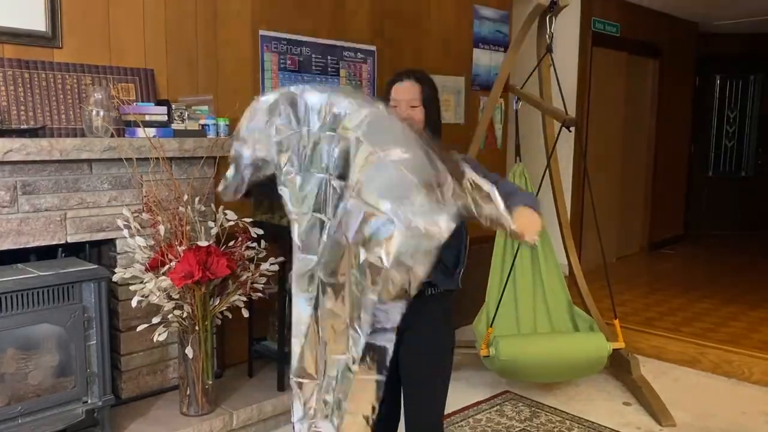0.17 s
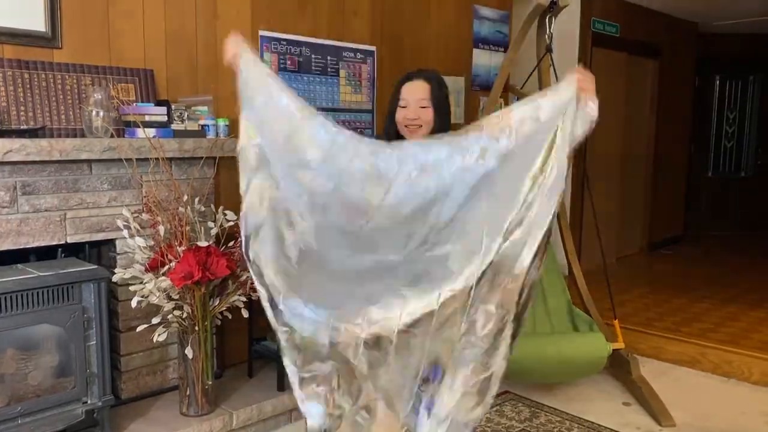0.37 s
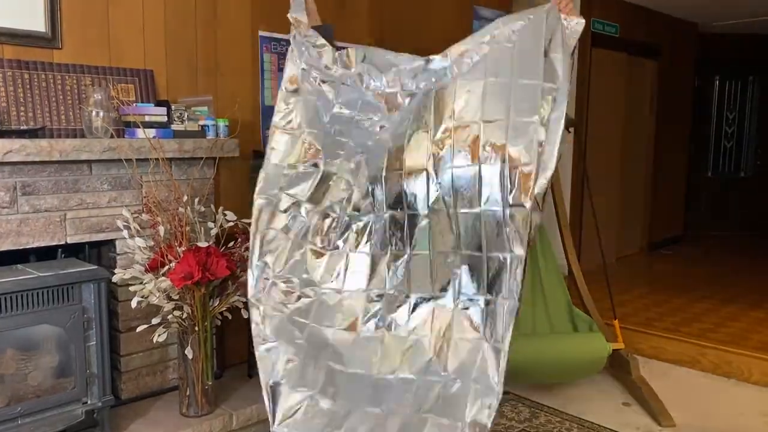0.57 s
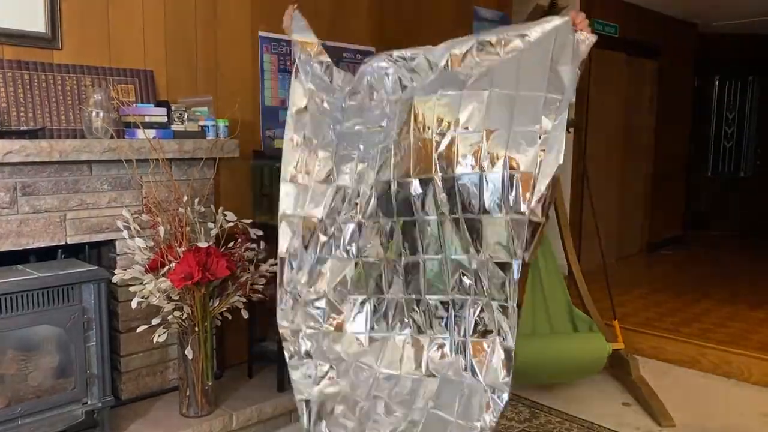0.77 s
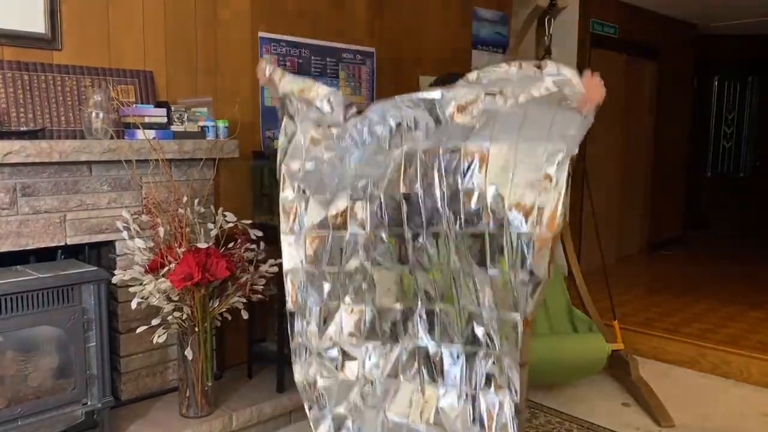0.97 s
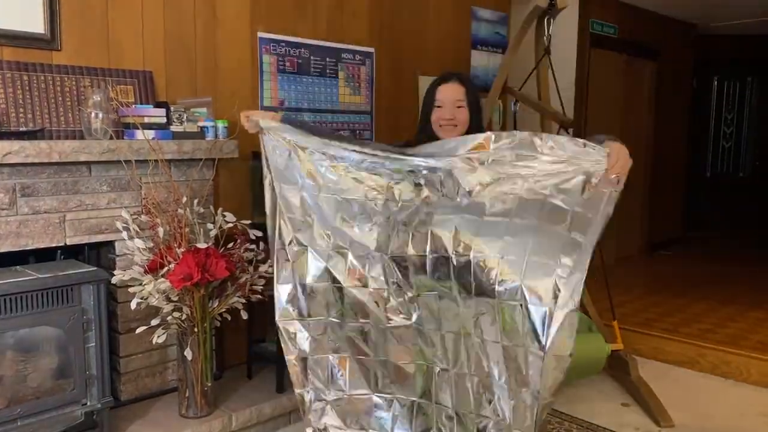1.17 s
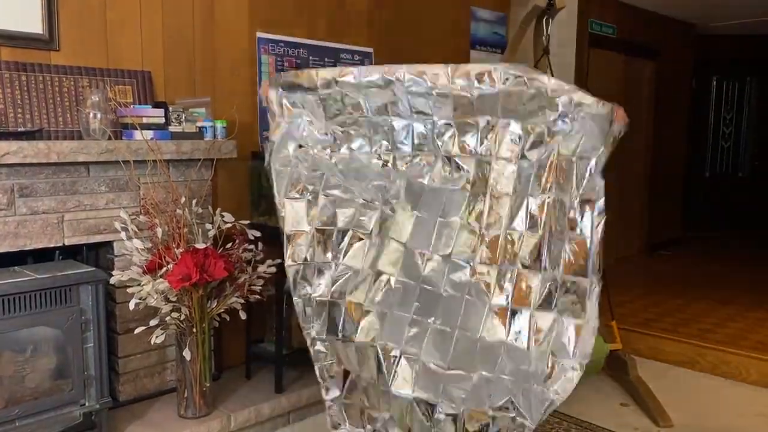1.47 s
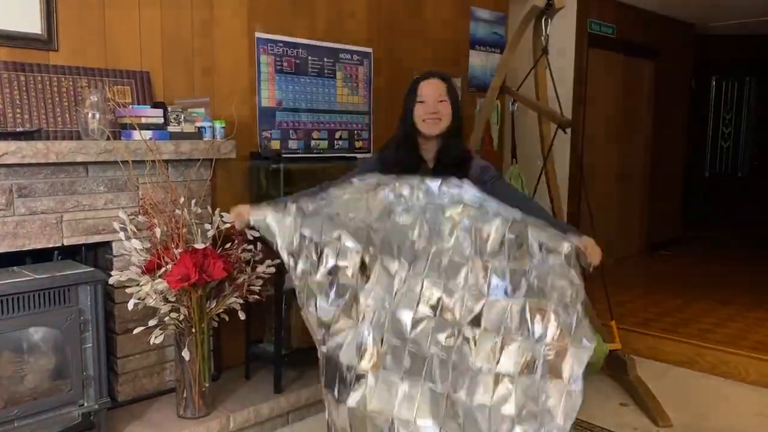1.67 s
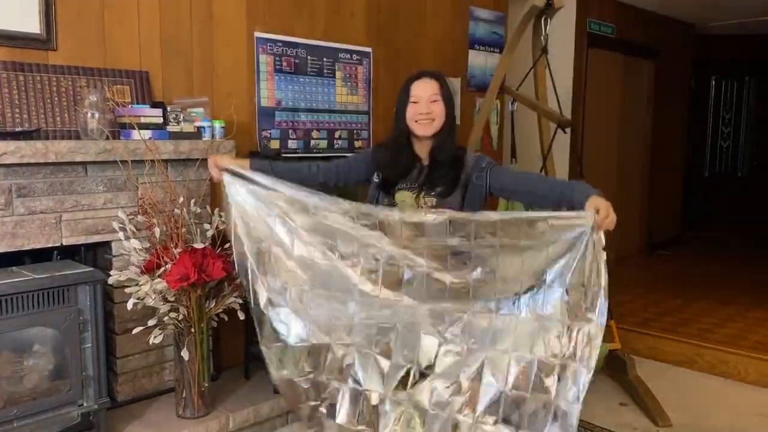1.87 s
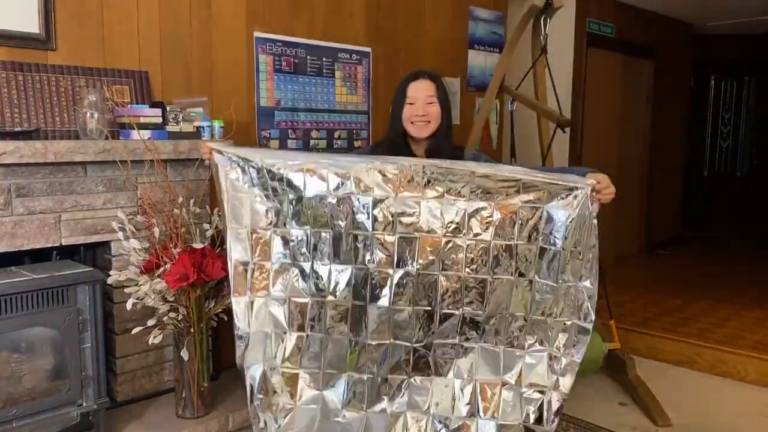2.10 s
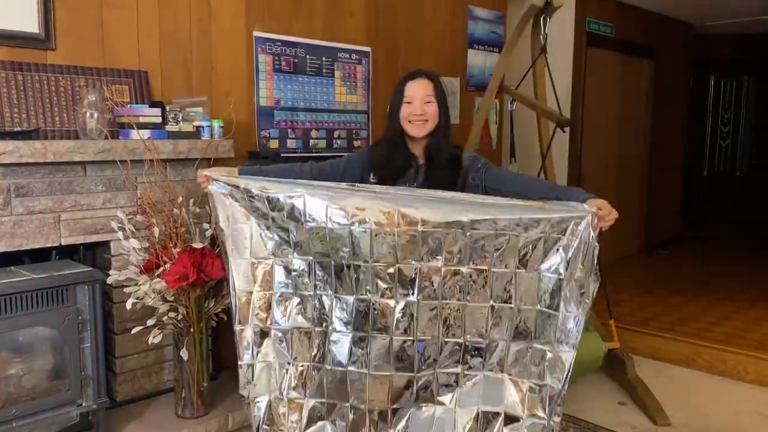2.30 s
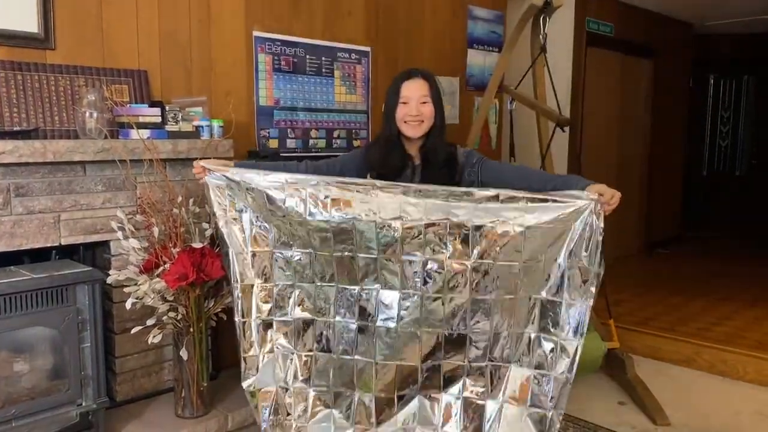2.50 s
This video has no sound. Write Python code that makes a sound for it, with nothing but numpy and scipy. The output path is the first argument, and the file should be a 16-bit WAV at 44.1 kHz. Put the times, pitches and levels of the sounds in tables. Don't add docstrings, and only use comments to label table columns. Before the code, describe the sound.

A thin metallic foil sheet is shaken open, crinkling brightly in rustling swells indoors

```python
import sys
import numpy as np
from scipy import signal
from scipy.fft import rfft, irfft, next_fast_len
from scipy.io import wavfile

SR = 44100
rng = np.random.default_rng(int(sys.argv[2]) if len(sys.argv) > 2 else 0)


def wav_record(signal):
    frames = np.transpose(np.atleast_2d(signal))
    bounded = np.clip(frames, -1, 1)
    quanta = np.round(bounded * 32767).astype(np.int16)
    wavfile.write(sys.argv[1], SR, quanta)


def magnitude_from_level(level_db):
    exponent = np.asarray(level_db, float) / 20
    return 10 ** exponent


N = 116865


def rms_one(x):
    return x / np.sqrt(np.mean(x ** 2) + 1e-20)


def shaped(x, gain_at):
    size = next_fast_len(N + 4096)
    hz = np.arange(size // 2 + 1) * SR / size + 1
    return irfft(rfft(x, size) * gain_at(hz), size)[..., :N]


def at_hz(points, hz):
    table_hz, table_db = np.transpose(points)
    return np.interp(np.log(hz), np.log(table_hz), table_db)


def drift(rate_hz):
    r = np.exp(-80 * np.pi * rate_hz / SR)
    noise = rng.standard_normal(N // 40 + 2002)
    slow = signal.lfilter([1], [1, -2 * r, r * r], noise)[2000:]
    return np.interp(np.arange(N) / 40, np.arange(len(slow)), rms_one(slow - slow.mean()))


def bumps(rows):
    t = np.arange(N) / SR
    return sum(db * np.exp(-.5 * ((t - centre) / half) ** 2) for centre, db, half in rows)


# time in seconds, level in dB, brightness in dB.
SHAKE = [(0.0, -40.5, -2.5), (0.11, -42.5, -2), (0.23, -31, -3.5), (0.37, -34.5, -2.5), (0.46, -23.5, -3),
         (0.74, -38.5, -2.5), (0.79, -45, -1), (0.97, -45.5, -3.5), (1.16, -46.5, -2), (1.34, -33, -1.5),
         (1.61, -42, -2.5), (1.67, -38.5, -3), (1.73, -32, -2), (1.86, -41, -4), (1.98, -32.5, -2.5),
         (2.34, -45.5, -5.5), (2.65, -50.5, -4)]
# centre in seconds, gain in dB, half width in seconds.
TUGS = [(.42, 1, 0.017), (.465, 0.5, .015), (1.76, 2.5, .02), (.39, -2, .015), (.76, 1.5, 0.011),
        (.85, 2, 0.015), (1.8, 1.5, .02), (2.04, 0.5, 0.035), (2.63, 2.5, 0.017), (1.07, 2, 0.017),
        (1.24, 1.5, 0.024), (1.7, 0, 0.025), (1.96, 1, .03), (2.416, 1, 0.026), (2.566, 3, 0.016)]


def vigour():
    t = np.arange(N) / SR
    shake_s, shake_db, bright_db = np.transpose(SHAKE)
    return np.interp(t, shake_s, shake_db) + bumps(TUGS), np.interp(t, shake_s, bright_db)


def creases(level_db, bright_db):
    snaps_per_s, density_follows, spread_db = 9000, .3, 1.5
    density = magnitude_from_level(density_follows * (level_db - level_db.mean()))
    chance = np.clip(snaps_per_s * density / SR, 1e-3, 1)
    sizes = magnitude_from_level(spread_db * np.minimum(rng.exponential(1, (2, N)), 5))
    sizes = sizes * rng.choice([-1, 1], (2, N))
    happens = rng.random((2, N)) < chance
    snaps = rms_one(sizes * happens / np.sqrt(chance))
    clumps_db = .6 * drift(90)
    flutter_db = .4 * drift(9)
    snaps = snaps * magnitude_from_level(level_db + clumps_db + flutter_db)
    rustle = 0
    for step in np.arange(-7., 3., .5):
        share = lambda hz: np.cos(np.pi * np.clip(np.log2(hz / 2800) - step, -.5, .5)) ** 2
        flicker_db = 1.0 * drift(40)
        rustle = rustle + shaped(snaps, share) * magnitude_from_level(flicker_db + bright_db * max(step, 0) / 2)
    return rustle


def room(x):
    t60_s, wet_db, delay_s = 0.19, -9, 0.0065
    t = np.arange(SR // 2) / SR
    part = rng.integers(0, 4, N)
    wet = 0
    for k in range(4):
        tail = rng.standard_normal((2, len(t))) * magnitude_from_level(-60 * t / t60_s) * (t > delay_s)
        tail = tail / np.sqrt(np.sum(tail ** 2, axis=1, keepdims=True))
        wet = wet + signal.fftconvolve(x * (part == k), tail, axes=1)[:, :N]
    return (x + magnitude_from_level(wet_db) * wet) / np.sqrt(1 + magnitude_from_level(2 * wet_db))


# frequency in Hz, level in dB.
FILM = [(60, -6), (140, -6), (500, -3), (1430, -2.5), (7300, -1), (8600, -0.5), (12600, 2.5), (16000, -1.5)]
# frequency in Hz, side minus mid in dB.
WIDTH = [(60, -38), (180, -26), (500, -5.5), (1500, -2.5), (3000, -3.5), (6500, -2), (8600, 5.5),
         (10200, -4.5)]


def rustle_at_microphone(rustle):
    mid, side = shaped(rustle, lambda hz: magnitude_from_level(at_hz(FILM, hz) + 4.5))
    side = shaped(side, lambda hz: magnitude_from_level(at_hz(WIDTH, hz)))
    lean = 0.15 * mid + 0.65 * np.gradient(mid)
    side = side + shaped(lean, lambda hz: 1 / (1 + (500 / hz) ** 2) / (1 + (hz / 7000) ** 4))
    return mid, side


# centre in seconds, gain in dB, half width in seconds.
PUSHES = [
    (.24, 2, 0.05),
    (.47, 0, 0.055),
    (.7, 2, 0.055),
    (1.23, 10, .02),
    (1.65, -8, 0.031),
    (1.77, 3, 0.02),
    (2.2, 1, .06),
    (2.55, 0, .08),
]


def puffs(level_db):
    centre_hz, puff_db, follows = 136, -26, 1.16
    band = lambda hz: (hz / centre_hz) ** 2 / (1 + (hz / centre_hz) ** 4)
    air = rms_one(shaped(rng.standard_normal((2, N)), band))
    peak_db = level_db.max()
    return air * magnitude_from_level(puff_db + peak_db + follows * (level_db - peak_db) + bumps(PUSHES))


def rumble():
    low_hz, high_hz, rumble_db = 47.7, 64.6, -64
    band = lambda hz: 1 / (1 + (low_hz / hz) ** 3) / (1 + (hz / high_hz) ** 2)
    return magnitude_from_level(rumble_db) * rms_one(shaped(rng.standard_normal((2, N)), band))


def scene():
    level_db, bright_db = vigour()
    mid, side = rustle_at_microphone(room(creases(level_db, bright_db)))
    low_mid, low_side = puffs(level_db) + rumble()
    mid = mid + low_mid
    side = side + magnitude_from_level(-16) * low_side
    left_db = -0.24
    return np.array([mid + side, mid - side]) * magnitude_from_level([[left_db], [-left_db]])


# centre in Hz, width in Hz, gain in dB.
PORTS = [(8600, 500, -3), (12550, 120, -3), (12870, 130, 6), (13450, 300, -9), (14100, 300, 5)]


def port_colour(mid):
    colour_db = lambda hz: sum(db * np.exp(-.5 * ((hz - at) / wide) ** 2) for at, wide, db in PORTS)
    return shaped(mid, lambda hz: magnitude_from_level(colour_db(hz)))


def dropped(x, bands, chance):
    lost = 0
    for low, high, bias in bands:
        shut = np.clip((bias - chance()) * 8, 0, 1)
        lost = lost + shaped(x, lambda hz: (hz > low) & (hz < high)) * shut
    return x - lost


# low edge in Hz, high edge in Hz, bias to be shut.
MID_DROPS = [(13050, 13400, .3), (13400, 13780, .9)]
# low edge in Hz, high edge in Hz, bias to be shut.
SIDE_DROPS = [(10340, 11020, 1.0), (11020, 11710, -.5), (11710, 13090, -.3), (13090, 14470, .3),
              (14470, 15160, .2), (15160, 16000, -.2)]


def treble_dropouts(mid, side):
    dropout_hz, quiet_after_s, quiet_top_hz = 8, 1.8, 15200
    side = dropped(side, SIDE_DROPS, lambda: drift(dropout_hz))
    shared = drift(dropout_hz)
    mid = dropped(mid, MID_DROPS, lambda: shared)
    late = np.where(np.arange(N) > quiet_after_s * SR, .1, -9)
    mid = dropped(mid, [(quiet_top_hz, SR, late)], lambda: drift(dropout_hz))
    return mid, side


def low_pass(x):
    return signal.sosfilt(signal.butter(12, 16900, fs=SR, output="sos"), x)


def record(dry):
    mid, side = (dry[0] + dry[1]) / 2, (dry[0] - dry[1]) / 2
    side = shaped(side, lambda hz: np.where(hz > 10340, magnitude_from_level(-0.5), 1))
    mid, side = treble_dropouts(port_colour(mid), side)
    bass_hz, top_hz = 47.7, 15720
    both = np.array([mid + side, mid - side])
    both = shaped(both, lambda hz: (hz < top_hz) / (1 + (bass_hz / hz) ** 3))
    return low_pass(both)


dry = scene()
out = record(dry)
wav_record(out)
```